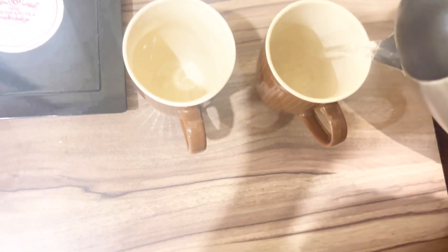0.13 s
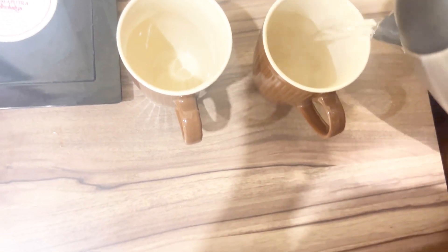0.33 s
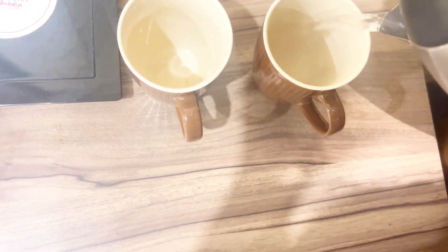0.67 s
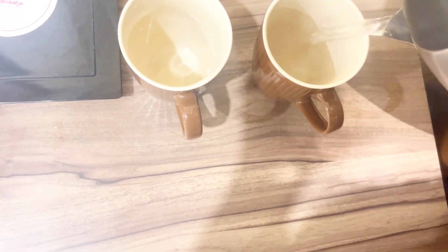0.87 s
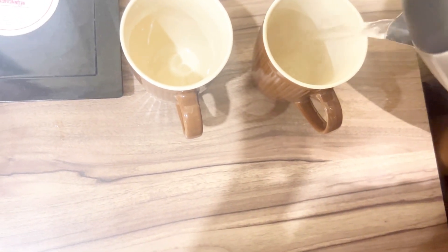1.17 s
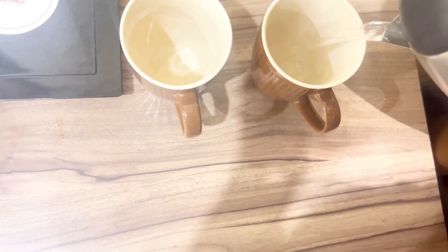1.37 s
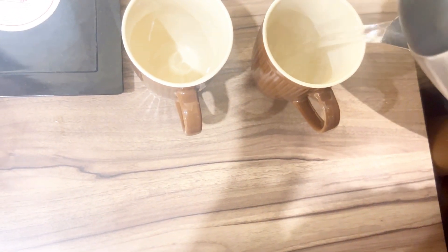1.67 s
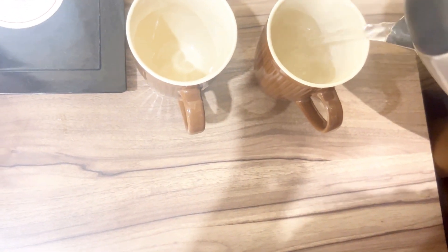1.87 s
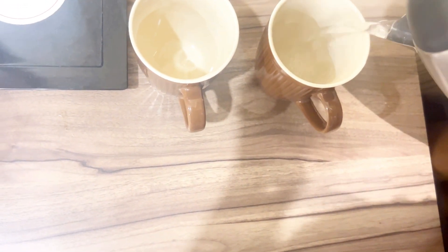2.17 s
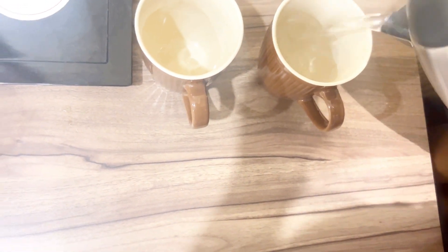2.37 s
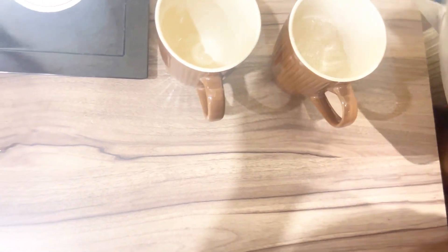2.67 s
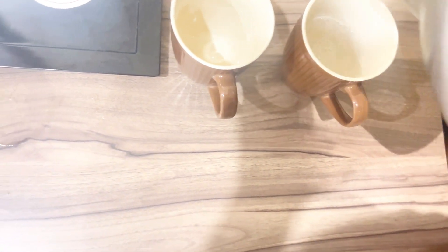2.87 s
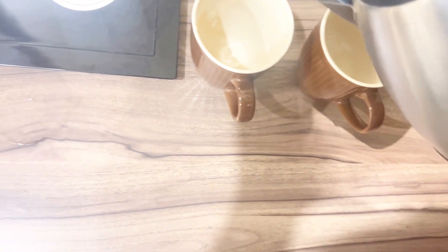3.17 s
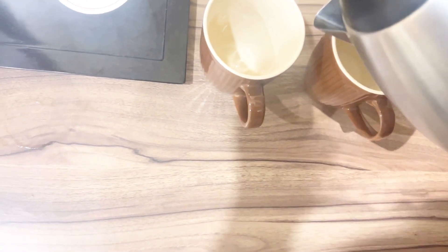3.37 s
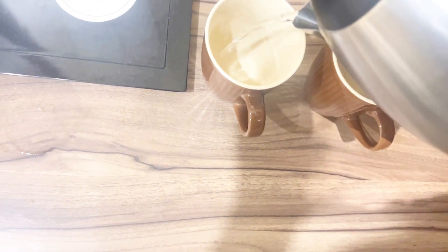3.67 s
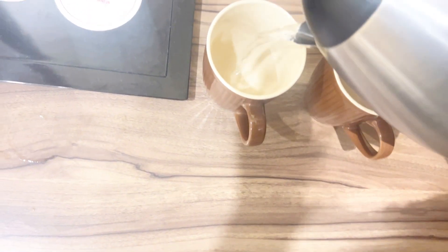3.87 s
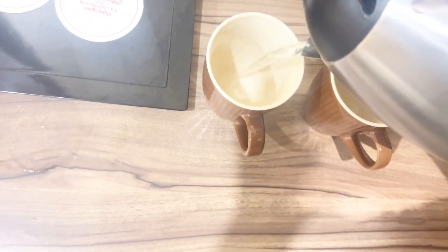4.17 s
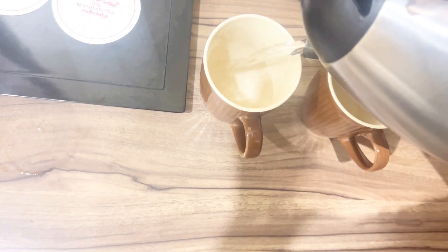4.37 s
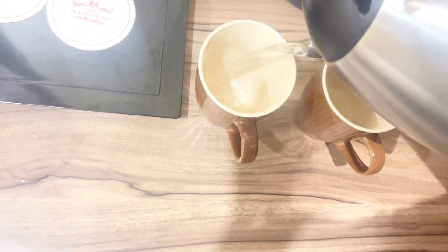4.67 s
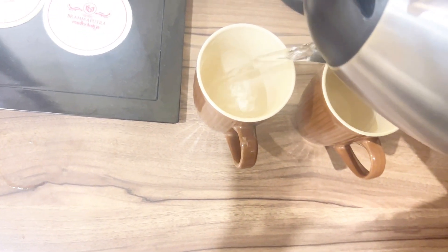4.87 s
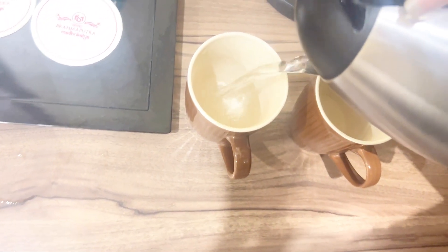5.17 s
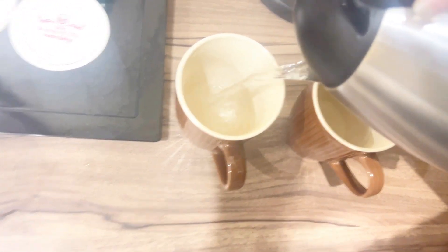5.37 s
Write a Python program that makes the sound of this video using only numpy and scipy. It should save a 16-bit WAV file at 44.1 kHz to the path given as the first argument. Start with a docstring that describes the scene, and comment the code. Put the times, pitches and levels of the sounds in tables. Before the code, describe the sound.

Close-up pouring from a metal kettle into two mugs: lively plopping stream, short quiet gap with a tiny ring, then a crisper second stream.

```python
"""Water is poured from an electric kettle into one ceramic mug, then into a second, over a low room hum.
Each stream is a mix of small bubbles, a low gurgle and ticking spray; trapped air plops as dying sines
that sink in pitch, and splashes are clumps of tiny bubbles in noise. Foam fizzes in the first mug.
Between the pours a tap on the kettle rings faintly. Mug and kettle modes colour the water, then an echo,
a diffuse tail and two close microphone ports, listening from above, make it stereo."""
import sys
import numpy as np
from scipy import signal
from scipy.fft import rfft, irfft
from scipy.io import wavfile
from scipy.ndimage import uniform_filter1d

SR = 44100
rng = np.random.default_rng(int(sys.argv[2]) if len(sys.argv) > 2 else 0)


def int16_out(signal):
    """Quantize to a 16-bit WAV file."""
    q = np.round(np.clip(np.atleast_2d(signal).T, -1, 1) * 32767)
    wavfile.write(sys.argv[1], SR, q.astype(np.int16))


N = 243431
TIME = np.arange(N) / SR  # s
BINS = np.fft.rfftfreq(N, 1 / SR)  # Hz
SWAP_S = 3.5  # sounds before this belong to the first mug


def gain_of(db):
    """Decibels to amplitude."""
    return 10 ** (np.asarray(db) / 20)


def evened(x):
    """Scales to rms 1."""
    return x / np.sqrt(np.mean(x ** 2) + 1e-20)


def peaked(x):
    """Scales to peak 1."""
    return x / (abs(x).max() + 1e-12)


def read(points, hz):
    """Reads a table on a log-frequency axis."""
    f, value = np.transpose(points)
    return np.interp(np.log(hz + 1), np.log(f + 1), value)


def add(mix, s, sound):
    """Mixes a sound in at time s."""
    part = mix[max(round(s * SR), 0):][:len(sound)]
    part += sound[:len(part)]


def coloured(x, points, size=2048):
    """Causal minimum-phase filter with the given spectrum shape and unit energy."""
    log_gain = np.log(gain_of(read(points, abs(np.fft.fftfreq(size, 1 / SR)))))
    spectrum = np.exp(np.conj(signal.hilbert(log_gain)))
    taps = np.fft.ifft(spectrum).real[:size // 2]
    return signal.oaconvolve(x, taps / np.linalg.norm(taps))[:len(x)]


def ring(modes, t):
    """Sum of dying sines, each falling 60 dB in its t60."""
    out = np.zeros(len(t))
    for hz, t60, db in modes:
        out += gain_of(db) * np.exp(-np.log(1000) * t / t60) * np.sin(2 * np.pi * hz * t)
    return out


def ringing(x, modes, share):
    """A sound together with the modes that it wakes, their highest resonance scaled to share."""
    body = ring(modes, TIME[:SR // 3])
    return x + share * signal.oaconvolve(x, body / abs(rfft(body)).max())[:N]


def bubble(hz, cycles, sag, rise=0.84, size=2400):
    """An air pocket swells within a cycle, sinks to hz (climbs if sag is negative) and dies in a few cycles."""
    age = hz * TIME[:size]  # in cycles
    turns = age + sag * cycles * (1 - np.exp(-age / cycles))
    swell = 1 - np.exp(-(age / rise) ** 2)
    return peaked(swell * np.exp(-age / cycles) * np.sin(2 * np.pi * turns))


def notes(rows, cycles, sag):
    """Single bubbles, each at its own time, strength and pitch."""
    out = np.zeros(N)
    for s, db, hz in rows:
        add(out, s, gain_of(db) * bubble(hz, cycles, sag))
    return out


def patter(per_s, spread_db):
    """Random impulses of random sign, most small and a few large."""
    size = gain_of(spread_db * np.minimum(rng.exponential(1, N), np.pi))
    return size * rng.choice([-1, 1], N) * (rng.random(N) < per_s / SR)


def swarm(low_hz, high_hz, per_s, cycles, spread_db, count=16):
    """Small bubbles of many sizes, born at random."""
    out = np.zeros(N)
    for hz in np.geomspace(low_hz, high_hz, count):
        births = patter(per_s / count, spread_db)
        out += signal.oaconvolve(births, bubble(hz, cycles, sag=0.14))[:N]
    return evened(out)


def droplets(per_s, spread_db, mist=0.24, crackle=0.46):
    """Countless tiny ticks of many pitches and a few dry pops, in a fine hiss."""
    ticks = swarm(2007, 12400, per_s, cycles=2.9, spread_db=spread_db, count=24)
    ticks = coloured(ticks, [(1900, 14.0), (14000, 2.4)])
    pops = evened(patter(per_s / 10, spread_db))
    return evened(evened(ticks) + crackle * pops + mist * rng.standard_normal(N))


def depth_db(age, shallow_db=-2.5, deep_after_s=1):
    """Low sounds are weak until the water is deep enough, age seconds into a pour."""
    return shallow_db * (1 - np.clip(age / deep_after_s, 0, 1))


# spectrum of the room noise: f/Hz, level/dB (relative, per Hz)
ROOM_NOISE = [(24, -17), (40, -11), (97, -2.5), (209, -16.5), (342, -17.5), (752, -36.5), (1010, -34),
              (2710, -48), (4500, -48.5), (5680, -57.5), (14500, -69)]
# likeness of the noise at the two ports: f/Hz, correlation (0 to 1)
NOISE_LIKENESS = [(150, 0.98), (1000, 0.17)]
# hum lines: f/Hz, level/dB (rms)
HUM_LINES = [(48.4, -52), (90.5, -58), (117, -58), (177.7, -55)]


def background(noise_db=-48, waver=0.49):
    """Rumble and faint hiss of the room, partly alike at the two ports, with wavering hum lines."""
    a, b = rfft(rng.standard_normal((2, N)))
    same = read(NOISE_LIKENESS, BINS)
    pair = np.array([a, same * a + np.sqrt(1 - same ** 2) * b])
    noise = irfft(pair * gain_of(read(ROOM_NOISE, BINS)), N)
    knots = np.linspace(0, TIME[-1], 40)
    hum = np.zeros(N)
    for hz, db in HUM_LINES:
        wander = rng.standard_normal(len(knots)) + 1j * rng.standard_normal(len(knots))
        drift = np.interp(TIME, knots, wander)  # moves both strength and phase
        carrier = np.exp(2j * np.pi * (hz * TIME + rng.random()))
        hum += gain_of(db) * evened(((1 + waver * drift) * carrier).real)
    return gain_of(noise_db) * evened(noise) + hum


# the streams: t/s, plunge into the water level/dB, spray off the glaze level/dB (both before trims)
FIRST_STREAM = [(0.0, -62.5, -69), (0.56, -54, -59.5), (0.8, -57, -59), (0.95, -49, -58), (1.2, -53.5, -60),
                (1.65, -52, -67), (2.36, -57, -65.5), (2.64, -52.5, -58), (2.73, -84, -70)]
SECOND_STREAM = [(4.3, -87, -95), (4.37, -65, -42.5), (4.46, -84, -103), (4.58, -67, -57),
                 (4.8, -68.5, -64.5), (4.92, -55.5, -52.5), (5.1, -56, -57.5), (5.36, -55.5, -57.5),
                 (5.52, -52, -56)]
# colour of the spray in each mug: f/Hz, level/dB (relative)
FIRST_MUG_SPRAY = [(900, 15.5), (1600, -4), (2900, 3), (5400, 13.5), (7200, 3.5), (9500, 12.5),
                   (14000, 4.5)]
SECOND_MUG_SPRAY = [(900, -1), (1600, -3.5), (2200, -12), (2800, -7.5), (5700, 0), (7200, -6), (11600, 4),
                    (16000, -4)]
# hollow ring of kettle and mug: f/Hz, t60/s, level/dB (relative)
HOLLOW_MODES = [(333, 0.12, 10.5), (461.8, 0.23, -4.5), (607, 0.12, 4), (870, 0.19, 3.5),
                (1108, 0.052, 2.5)]


def pour(stream, colour, low_hz, high_hz, bubbles_db, gurgle_db, spray_db, hollow,
         drops_per_s=650, gurgle_hz=310, clump_db=5, climb_per_s=0.09):
    """The running stream: small bubbles, a gurgle that grows with plunge and depth, and spray in uneven spurts."""
    gurgle_growth, usual_plunge_db = 1.66, -53  # dB of gurgle per dB of plunge, counted from the usual plunge
    s, *columns = np.transpose(stream)
    plunge_db, glaze_db = (np.interp(TIME, s, c, left=-120, right=-120) for c in columns)
    gurgle_level_db = gurgle_db + gurgle_growth * (plunge_db - usual_plunge_db) + depth_db(TIME - s[0])
    unevenness = evened(uniform_filter1d(rng.standard_normal(N), size=500))
    spurts = evened(gain_of(clump_db * np.clip(unevenness, -2, 2)))
    # the small bubbles climb in pitch as the mug fills, so they are read ever faster
    pace = 1 - climb_per_s * (s[-1] - np.clip(TIME, s[0], s[-1]))
    plips = swarm(low_hz, high_hz, per_s=90, cycles=3.04, spread_db=3.3)
    plips = np.interp(np.cumsum(pace) / SR, TIME, plips)
    high = gain_of(bubbles_db + plunge_db) * plips
    low = gain_of(gurgle_level_db) * swarm(gurgle_hz, 583, per_s=240, cycles=4.0, spread_db=3.5)
    ticks = evened(coloured(droplets(drops_per_s, spread_db=3.0), colour))
    spray = gain_of(spray_db + glaze_db) * spurts * ticks
    return ringing(high + low, HOLLOW_MODES, hollow) + spray


# the foam starts, is thickest, is gone: t/s
FOAM_TIMES = (0, 2.53, 4.54)
# colour of the bursting foam: f/Hz, level/dB (relative)
FOAM_COLOUR = [(2500, -16), (8000, -0.5), (14000, -1.5)]
# short swells of fizz: t/s, length/s, level/dB (rms held at the crest), centre f/Hz
FIZZ_SWELLS = [(0.886, 0.17, -53, 4280), (4.833, 0.16, -53.5, 4340)]


def fizz(width=0.23, foam_db=-73):
    """Foam builds up in the first mug, then fizzes away; the stream hisses briefly in each mug as banded noise."""
    bursts = evened(coloured(droplets(per_s=160, spread_db=4.0), FOAM_COLOUR))
    out = gain_of(foam_db) * bursts * np.interp(TIME, FOAM_TIMES, [0, 1, 0])
    for s, length, db, hz in FIZZ_SWELLS:
        band = 1 + (np.log((BINS + 1) / hz) / width) ** 2
        hiss = evened(irfft(rfft(rng.standard_normal(N)) / band, N))
        swell = np.hanning(int(length * SR))
        add(out, s, gain_of(db) * swell * hiss[:len(swell)])
    return out


# sharp droplet splashes: t/s, level/dB (before the trim), treble level/dB (before a 5.5 dB lift)
DROPLET_SPLASHES = [(0.065, -45, -17), (0.5443, -35, 29), (0.5612, -41.5, -16), (0.6696, -37.5, 11),
                    (0.6825, -36, 6), (0.7572, -41, 4), (1.265, -42, 0), (1.3955, -42, 3),
                    (1.4378, -26, -1), (1.8876, -39, -9), (2.0105, -34.5, 7.5), (2.0512, -44.5, -3),
                    (2.6168, -31, 1), (2.6625, -37.5, 8), (3.738, -53.5, -18.5), (3.949, -56.5, -15),
                    (4.067, -49, 4), (4.119, -32.5, -2.5), (4.3718, -37.5, -1), (4.444, -49, -36),
                    (4.5317, -46.5, -15), (4.5895, -44.5, -9), (4.7215, -35.5, -12.5),
                    (4.7414, -35.5, -12.5), (4.778, -32, 0.5), (4.8108, -36, -12), (4.859, -39.5, -13),
                    (4.9025, -38, -22), (4.9337, -39, -20), (4.9985, -40.5, -32), (5.0198, -35.5, -23.5),
                    (5.0765, -39, -17), (5.1745, -31.5, -11), (5.2975, -37.5, 4), (5.3417, -36.5, -10),
                    (5.489, -46, -11)]


def splashes(splash_db=6, lag_s=0.0042, mist_db=-17, mist_s=0.0025,
             fall_db=-10, fall_s=0.019, fall_per_s=350, count=20):
    """A clump of tiny bubbles, the smallest tending to come first, in a puff of mist; stray drops fall back."""
    out, t = np.zeros(N), TIME[:2048]
    # every air pocket throws up a small splash too
    spits = [(s, -25 + 0.81 * db, -9) for s, db, _ in AIR_POCKETS]
    drops = list(DROPLET_SPLASHES) + spits
    for (s, db, treble_db), draws in zip(drops, rng.random((len(drops), count, 3))):
        clump = np.zeros(len(t))
        for k, (pitch, late, size) in enumerate(draws):
            small = (k + pitch) / count
            tiny = bubble(1500 * 11.84 ** small, cycles=0.95, sag=0.46, size=512)
            add(clump, lag_s * late * (1.3 - small), (size - 0.5) * tiny * (0.5 + small))
        mist = rng.standard_normal(len(t)) * t / mist_s * np.exp(1 - t / mist_s)
        strays = rng.standard_normal(len(t)) * (rng.random(len(t)) < fall_per_s / SR)
        burst = peaked(clump) + gain_of(mist_db) * mist + gain_of(fall_db) * strays * np.exp(-t / fall_s)
        burst = coloured(burst, FIRST_MUG_SPRAY if s < SWAP_S else SECOND_MUG_SPRAY)
        burst = coloured(burst, [(5000, 0.011), (11000, treble_db + 5.5)])
        add(out, s, gain_of(db + splash_db) * peaked(burst))
    return out


# ring of the ceramic wall: f/Hz, t60/s, level/dB (relative)
CERAMIC_MODES = [(2800, 0.028, 8), (3120, 0.017, 12), (3520, 0.011, 15.5)]


def ceramic_wall(x):
    """Streams and splashes wake the high, very short modes of the ceramic."""
    return ringing(x, CERAMIC_MODES, share=1.77)


# air pockets: t/s, level/dB (before the trims of each part), f/Hz
AIR_POCKETS = [(0.095, -29, 968), (0.275, -31.5, 1055), (0.336, -36.5, 1065), (0.427, -37.5, 1055),
               (0.545, -31.5, 1053), (0.593, -35.5, 1080), (0.637, -31, 990), (0.757, -31.5, 960),
               (0.979, -31.5, 1030), (0.996, -32, 1046), (1.06, -34, 1070), (1.145, -31.5, 1094),
               (1.357, -21, 1032), (1.44, -22.5, 1094), (1.4758, -33.5, 1096), (1.588, -48, 1150),
               (1.613, -37, 1100), (1.751, -40, 1130), (1.833, -35, 1160), (1.889, -31, 1113),
               (1.962, -38.5, 1280), (2.01, -40.5, 1300), (2.1128, -41, 1270), (2.137, -36.5, 1315),
               (2.1882, -41, 1160), (2.2428, -52, 1240), (2.256, -36.5, 1130),  (2.528, -36, 1250),
               (2.567, -29.5, 1130), (2.587, -31.5, 1090), (2.616, -34, 1320), (2.633, -29.5, 1100),
               (4.724, -33, 943), (5.078, -22.5, 902), (5.174, -31, 1060), (5.246, -23.5, 983),
               (5.344, -31, 1015), (5.372, -20.5, 940), (5.472, -29.5, 863)]


def plops(plop_db=0.5, snap_db=-13, sigh_db=-17, sigh_lag_s=0.00433,
          gulp_db=-7.0, gulp_lag_s=0.00806, gulp_pitch=0.4):
    """Each air pocket snaps shut and rings briefly; a softer, lower note sinks after it, and the first mug gulps."""
    out = np.zeros(N)
    unlike = np.exp(0.22 * rng.standard_normal((len(AIR_POCKETS), 2)))
    for (s, db, hz), (longer, higher) in zip(AIR_POCKETS, unlike):
        add(out, s, gain_of(db + plop_db) * bubble(hz, cycles=2.52 * longer, sag=0.17, rise=0.95))
        add(out, s, gain_of(db + snap_db) * bubble(2000, cycles=0.24, sag=0, rise=0.71))
        add(out, s + sigh_lag_s, gain_of(db + sigh_db) * bubble(0.71 * hz, cycles=3.4, sag=0.45))
        if s < SWAP_S:
            gulp = bubble(gulp_pitch * higher * hz, cycles=1.78, sag=0.15)
            add(out, s + gulp_lag_s, gain_of(db + gulp_db + depth_db(s)) * gulp)
    return ringing(out, HOLLOW_MODES, share=0.7)


# clear single bubbles, small in the spray and larger as the spout fills: t/s, level/dB (peak), f/Hz
CLEAR_BUBBLES = [(0.209, -46, 3030), (1.889, -36, 4380), (3.84, -50.5, 866), (3.87, -55, 930),
                 (4.318, -43.5, 896), (4.374, -45.5, 894)]


def pings():
    """Single bubbles ring clearly for many cycles, climbing slightly in pitch."""
    return notes(CLEAR_BUBBLES, cycles=13.0, sag=-0.04)


# deep water closes over large air pockets: t/s, level/dB (peak, before the hollow ring), f/Hz
LOW_GULPS = [(0.888, -38, 453), (0.988, -29.5, 450), (1.052, -43, 494), (1.372, -38.5, 237),
             (1.685, -37, 457), (1.757, -37, 472), (1.912, -38, 371), (2.159, -39.5, 400),
             (5.083, -38.5, 590), (5.377, -35.5, 580)]


def gulps():
    """Large pockets give low, short notes that wake the hollow modes strongly."""
    return ringing(notes(LOW_GULPS, cycles=2.3, sag=0.046), HOLLOW_MODES, share=1.8)


# the kettle's ring: f/Hz, t60/s, level/dB (at the start)
KETTLE_MODES = [(2720, 0.022, -39), (2655, 0.44, -64), (2794, 0.47, -62)]


def clink(at_s=4.1445):
    """The kettle is tapped once: a short ping, then two close modes beat as they fade."""
    out = np.zeros(N)
    add(out, at_s, ring(KETTLE_MODES, TIME[:SR // 2]))
    return out


def echoes(x, delay_s=0.00975, echo_db=-9, dull_hz=1800):
    """The surroundings throw back one dull, inverted reflection, which hollows out the sound."""
    out = x.copy()
    b, a = signal.butter(1, dull_hz, fs=SR)
    add(out, delay_s, -gain_of(echo_db) * signal.lfilter(b, a, x))
    return out


# decay of the room: f/Hz, t60/s
ROOM_DECAY = [(200, 0.58), (1000, 0.29), (14000, 0.18)]


def room(x, wet_db=-14, onset_s=0.00091, shared=0.67):
    """A short diffuse tail of noise that dies sooner in the treble, partly alike at the two ports."""
    noise = rng.standard_normal((2, SR // 2)) + shared * rng.standard_normal(SR // 2)
    hz, t, z = signal.stft(noise, SR, nperseg=256)
    decay = np.exp(-np.log(1000) * t / read(ROOM_DECAY, hz)[:, None])
    z = z * decay * (1 - np.exp(-t / onset_s))
    tone = gain_of(read([(6000, 1.0), (10500, -6)], hz))[:, None]
    tail = signal.istft(z * tone, SR, nperseg=256)[1]
    tail = tail / np.linalg.norm(tail[0])
    return gain_of(wet_db) * signal.fftconvolve(x[None], tail, axes=1)[:, :N]


# phase between the ports: f/Hz, lead of the left/rad
PHASE_LEAD = [(100, 0), (1100, -1), (2400, 2), (3300, .7), (4600, .7), (5400, 3.1), (10200, 9.4),
              (15500, 16.1)]
# balance between the ports: f/Hz, left minus right level/dB
BALANCE = [(150, 0), (500, 6), (800, 1.5), (1300, -4), (1900, 1.5), (4400, -3), (5400, 4), (7000, -0.5)]


def ports(x):
    """Sound from the mugs reaches the two ports with different phase and strength."""
    half = np.exp(0.5j * read(PHASE_LEAD, BINS)) * gain_of(read(BALANCE, BINS) / 2)
    return irfft(rfft(x) * np.array([half, 1 / half]), N)


def scene():
    """Two pours with a kettle clink between them, in a quiet room."""
    first = pour(FIRST_STREAM, FIRST_MUG_SPRAY, low_hz=1108, high_hz=1434,
                 bubbles_db=-2.5, gurgle_db=-56.0, spray_db=-2.5, hollow=1.36)
    second = pour(SECOND_STREAM, SECOND_MUG_SPRAY, low_hz=904, high_hz=1337,
                  bubbles_db=3.5, gurgle_db=-58, spray_db=0.5, hollow=2.0)
    water = ceramic_wall(first + second + splashes())
    sources = water + plops() + gulps() + pings() + clink() + fizz()
    return ports(echoes(sources) + room(sources)) + background()


def record(dry):
    """Low cut at 35 Hz and a steep band limit at 16.3 kHz."""
    cut = signal.sosfilt(signal.butter(6, 35, "high", fs=SR, output="sos"), dry)
    taps = signal.firwin(511, 16300, window=("kaiser", 9), fs=SR)
    return signal.oaconvolve(cut, taps[None], "same")


dry = scene()
out = record(dry)
int16_out(out)
```